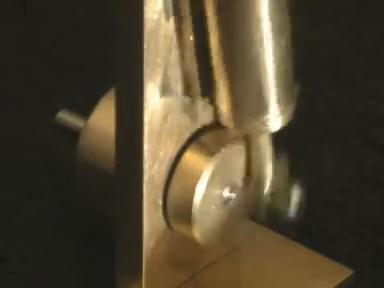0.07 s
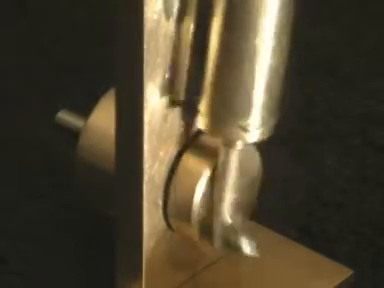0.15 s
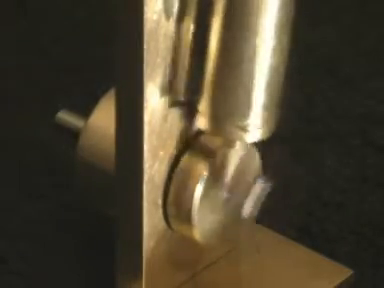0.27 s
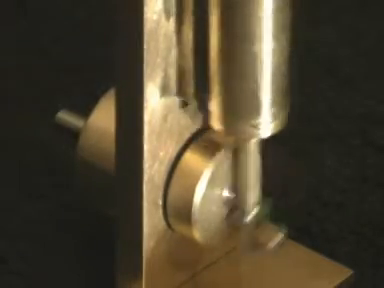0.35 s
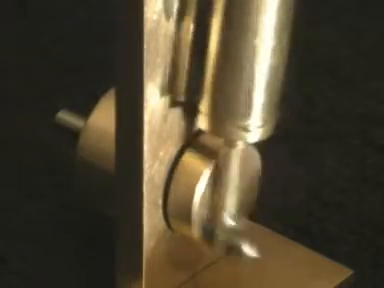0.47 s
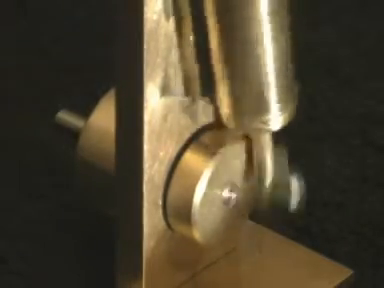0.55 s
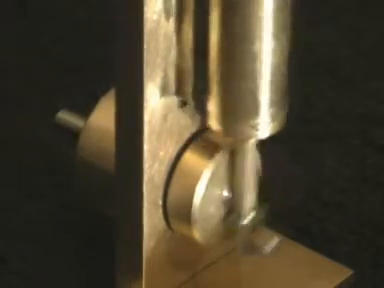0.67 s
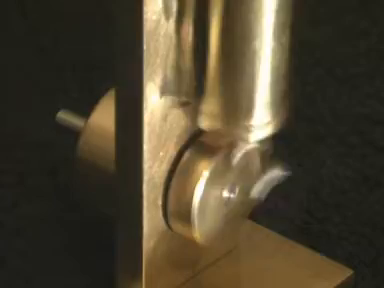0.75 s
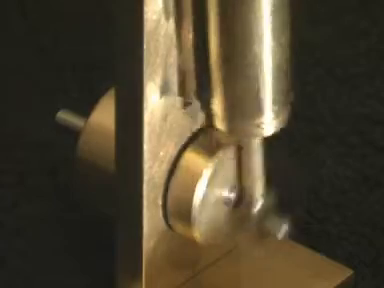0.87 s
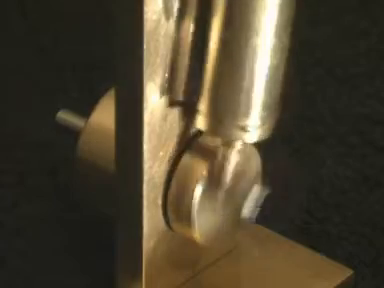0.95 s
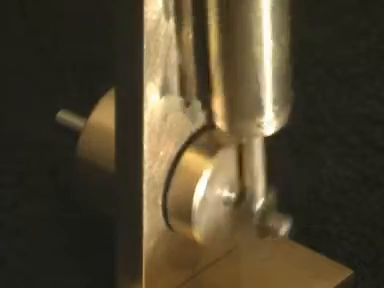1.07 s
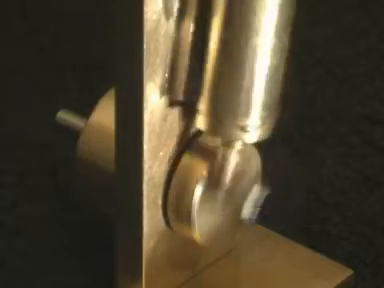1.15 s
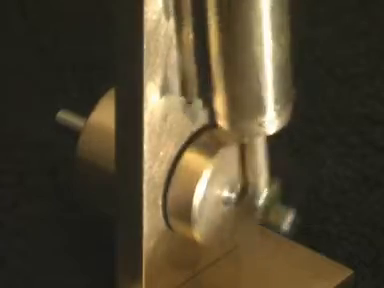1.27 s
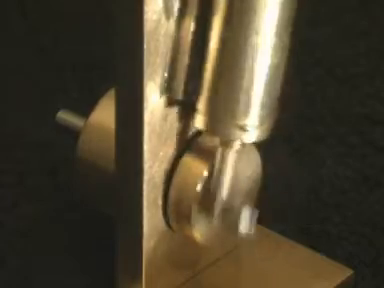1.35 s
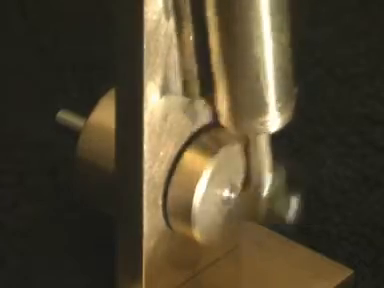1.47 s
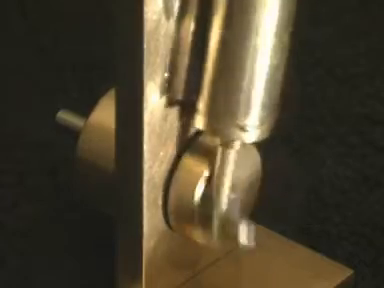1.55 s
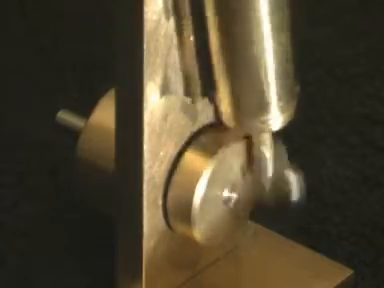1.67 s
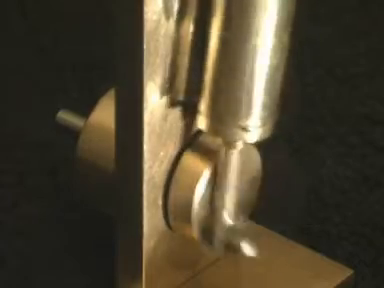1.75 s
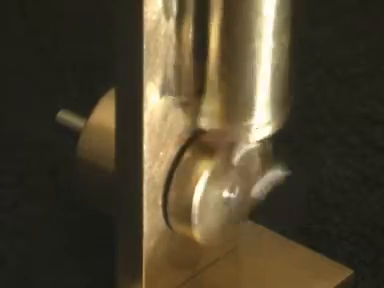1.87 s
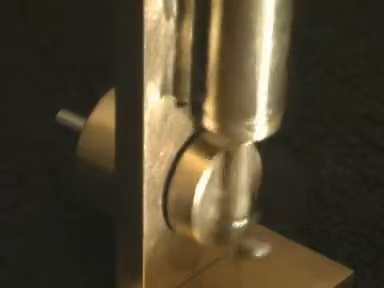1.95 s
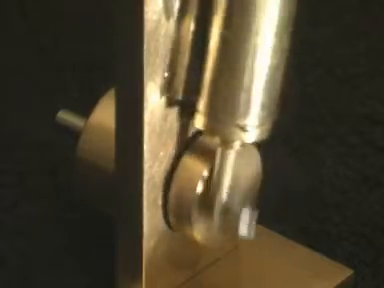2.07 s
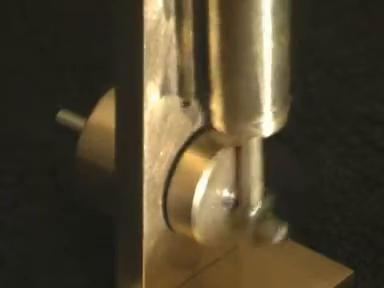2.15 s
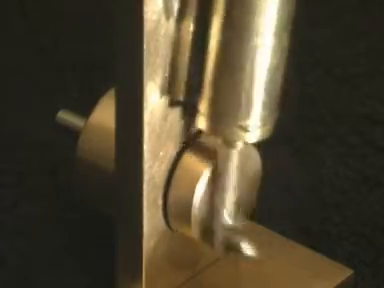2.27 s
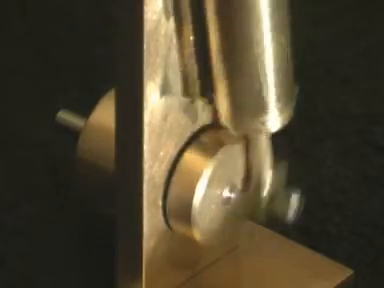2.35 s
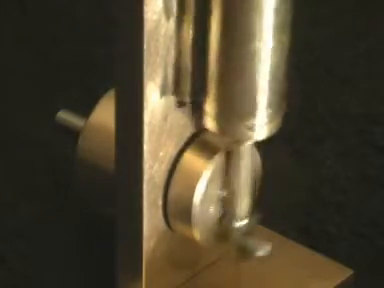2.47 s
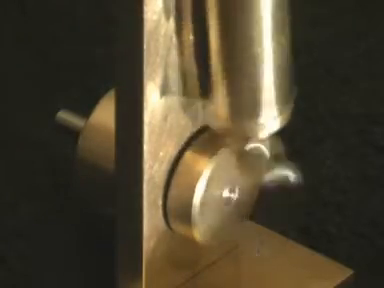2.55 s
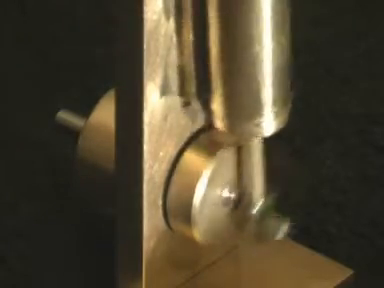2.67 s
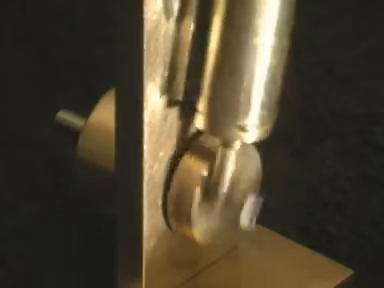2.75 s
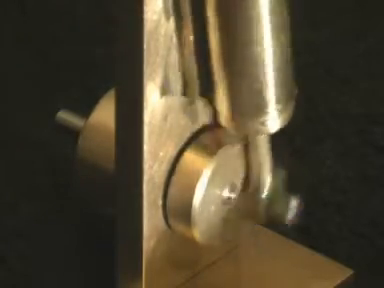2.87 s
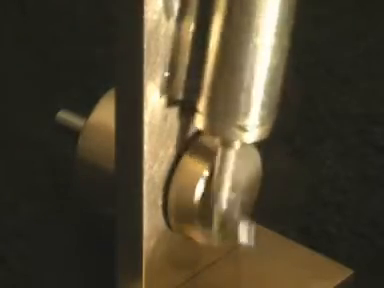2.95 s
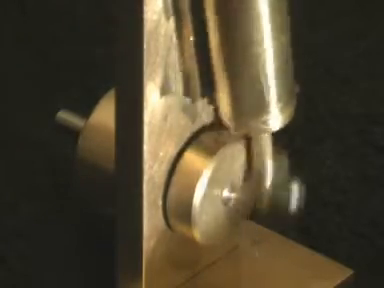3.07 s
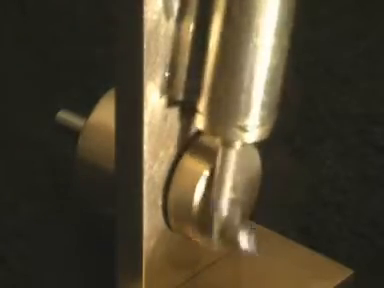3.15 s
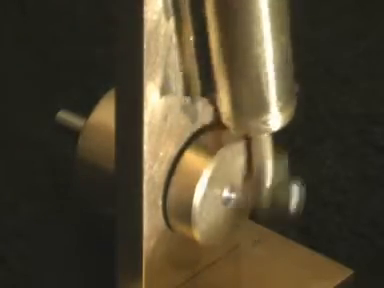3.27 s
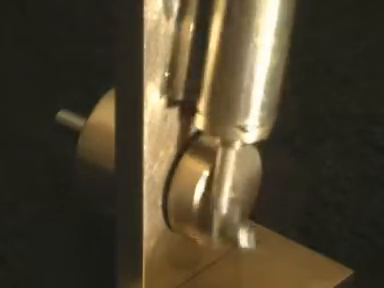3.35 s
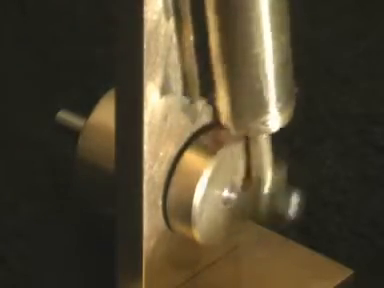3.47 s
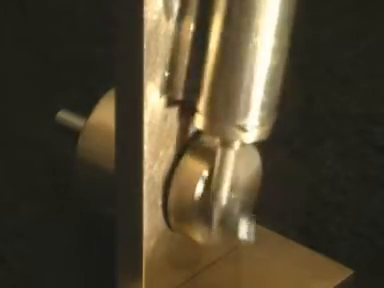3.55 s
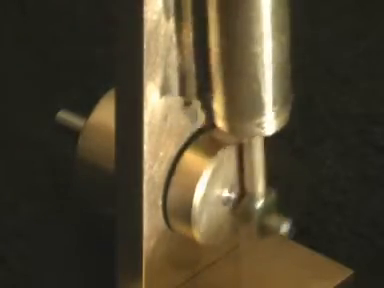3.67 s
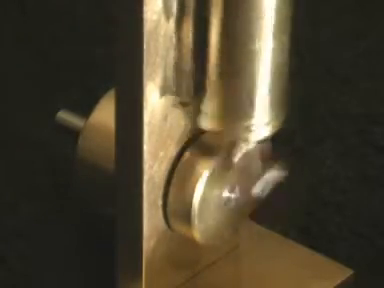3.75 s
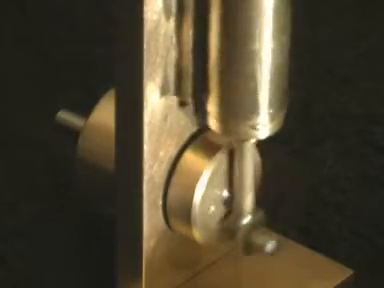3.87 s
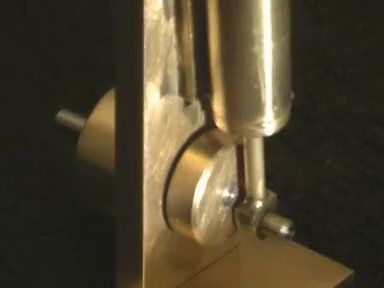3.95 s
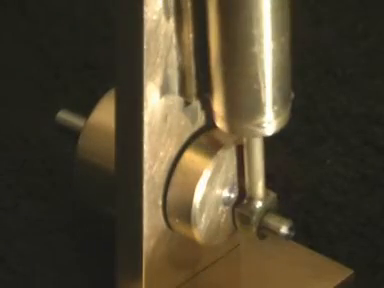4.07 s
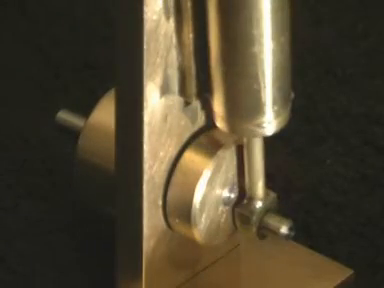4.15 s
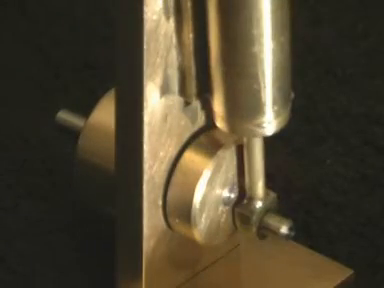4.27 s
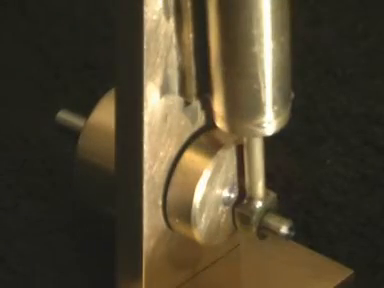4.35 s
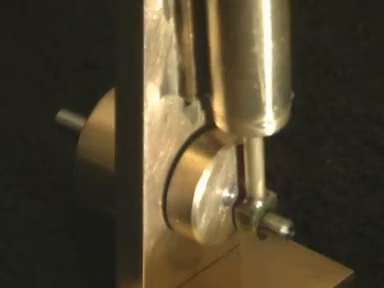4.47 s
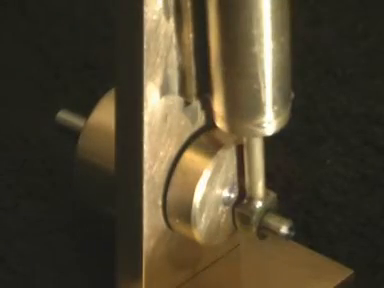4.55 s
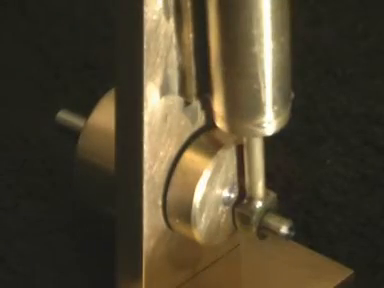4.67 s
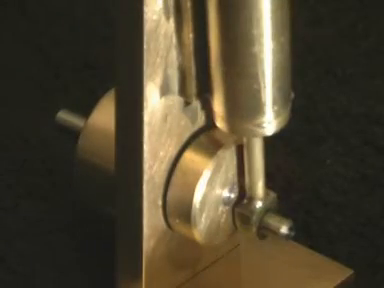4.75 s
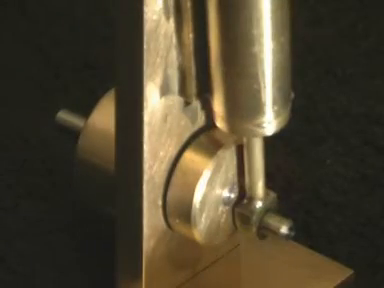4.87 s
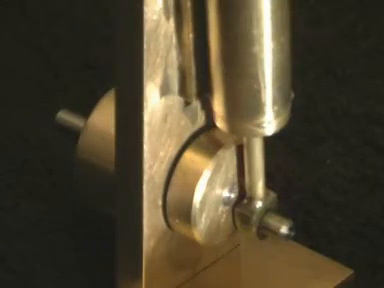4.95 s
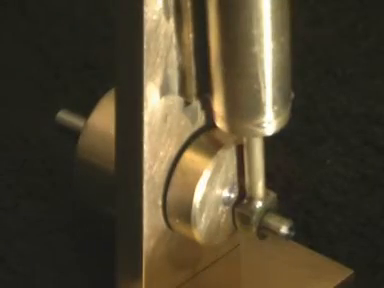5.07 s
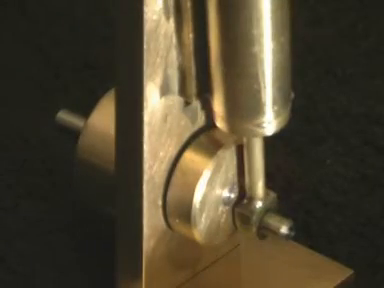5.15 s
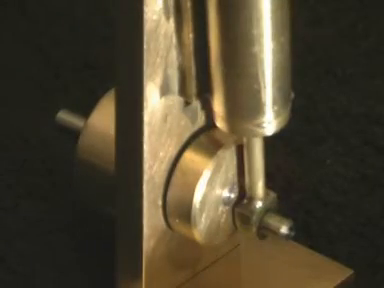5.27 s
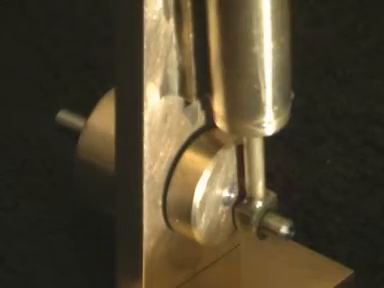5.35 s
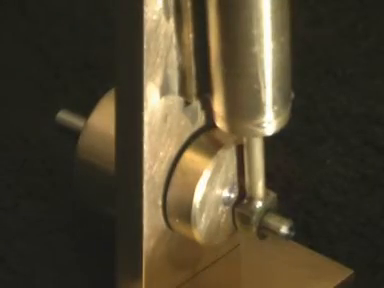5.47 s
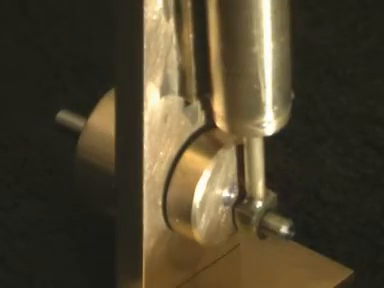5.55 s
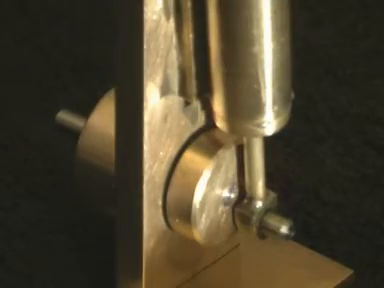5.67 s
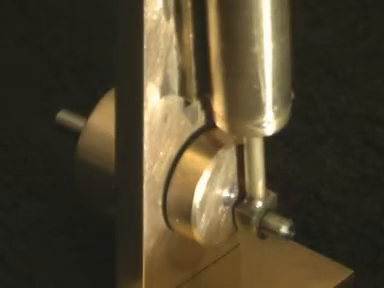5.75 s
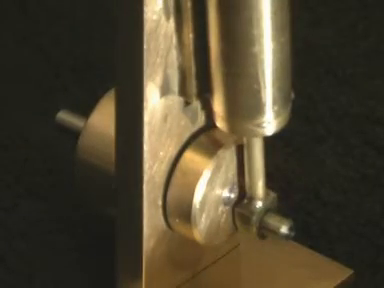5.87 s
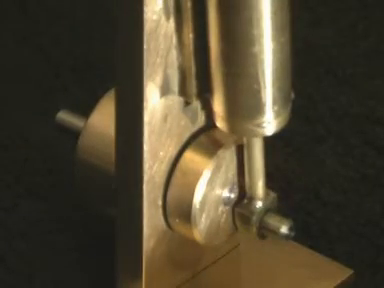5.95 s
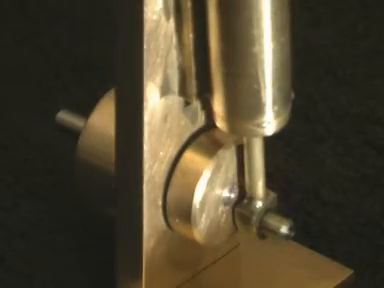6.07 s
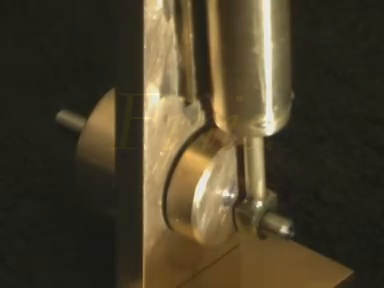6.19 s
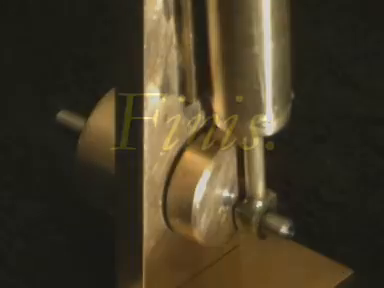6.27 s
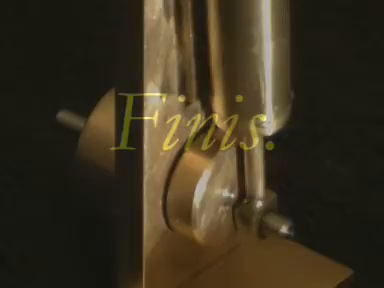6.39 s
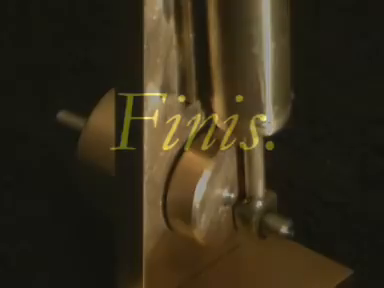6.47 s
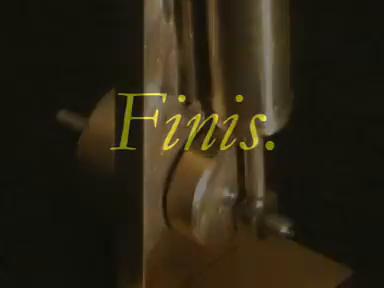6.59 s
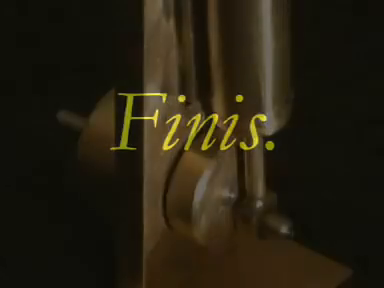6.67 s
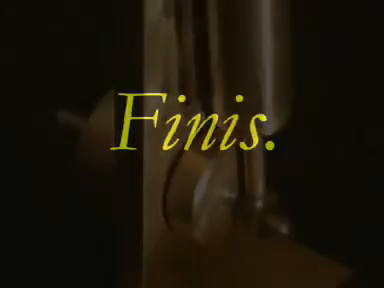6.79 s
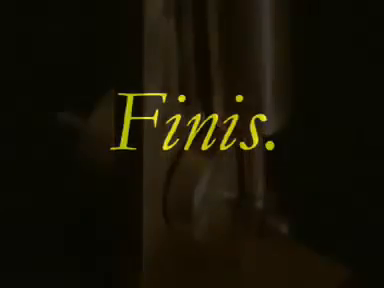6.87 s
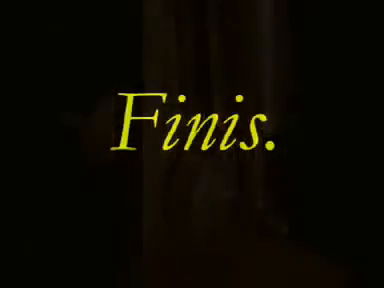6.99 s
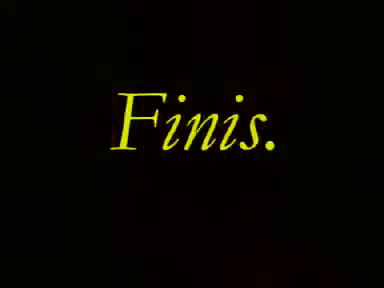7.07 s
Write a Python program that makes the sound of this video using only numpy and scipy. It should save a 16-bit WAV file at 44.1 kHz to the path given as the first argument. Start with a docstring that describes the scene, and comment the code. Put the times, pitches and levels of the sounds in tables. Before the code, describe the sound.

Rapid bright pulses of compressed air from a tiny oscillating engine sag slightly, stutter and cease at four seconds; faint hiss and room hum remain, then fade.

```python
"""In a humming room, a small brass oscillating-cylinder engine runs on compressed air, then slows and stops.
Each turn brings a spit of air, a rush into the cylinder, hiss past the rocking port face, a chuff and knocks.
The air sounds are coloured noise opened and closed by the crank angle; the knocks are short decaying low tones.
Air keeps leaking after the stop; the table, a set of ringing tones, is bumped twice, and all fades out."""
import sys
import numpy as np
from scipy import signal
from scipy.fft import rfft, irfft
from scipy.io import wavfile
from scipy.ndimage import uniform_filter1d

SR = 44100
rng = np.random.default_rng(int(sys.argv[2]) if len(sys.argv) > 2 else 0)


def file_out(sig):
    """Save sig as 16-bit WAV at sys.argv[1]."""
    # one column per channel
    cols = np.atleast_2d(sig).T
    # limit, then scale
    lim = np.clip(cols, -1, 1)
    pcm = np.round(lim * 32767).astype(np.int16)
    wavfile.write(sys.argv[1], SR, pcm)


N = 313992

# crank speed; the crank starts with the inlet just opening: start_s [s], speed [turns per s]
CRANK_SPEED = [(0, 6.166), (.43, 6.488), (1.1, 4.866), (1.33, 5.495), (1.53, 5.232), (1.8, 5.716),
               (2.62, 5.876), (3.6, 4.545), (3.81, 3.846), (3.87, 4.8), (3.93, 4), (3.97, 0)]
# resonances of cylinder, pipe and frame that colour every jet: pitch_hz [Hz], width_hz [Hz], level_db [dB]
BRASS_RINGS = [(1113, 160, 2.5), (1374, 190, 3.5), (1632, 82, 5), (2106, 680, 2.5), (2666, 180, 4.5),
               (3184, 130, 3.5), (3826, 170, 1.5), (4410, 92, 3.5), (4850, 77, 2), (6158, 160, 1.5),
               (7850, 260, 0), (8600, 210, 0), (9600, 190, 0), (10400, 370, 0.5), (10500, 200, 0),
               (12000, 250, 1)]
# steady machine and mains hum in the room: pitch_hz [Hz], level_db [dB rms, before slow wavering]
HUM_TONES = [(49.8, -70.5), (120, -67.5), (150, -62), (163, -64), (214, -72), (250, -71.5), (396, -66.5),
             (426, -70), (456, -71), (490, -72), (513, -69.5), (654, -66.5), (951, -82)]
# colour of the room air: pitch_hz [Hz], level_db [relative dB per Hz]
ROOM_COLOUR = [(25, -33), (75, -16), (110, -2.5), (170, 0), (300, -1.5), (430, 4.5), (580, -3.5),
               (800, 0.5), (1250, -4.5), (2000, -8.5), (5000, -17.5)]
# colour of the seep at the joint: pitch_hz [Hz], level_db [relative dB per Hz]
SEEP_COLOUR = [(1500, -26.5), (4000, -14), (5000, -11.5), (5700, -15), (7100, 0.5), (7900, -2), (8800, 1.5),
               (10300, -7.5), (12200, -8.5), (13250, -13), (13700, -6), (14700, -14), (15400, -20)]
# colour of the leak through the exhaust passage: pitch_hz [Hz], level_db [relative dB per Hz]
VENT_COLOUR = [(500, -13), (1000, -4.5), (1300, 3), (1490, -6.5), (1640, -0.5), (1850, -7), (2250, -4),
               (2420, -7.5), (2700, -3), (2900, 5), (3020, 0), (3200, -1), (4500, -3), (7000, -11)]
# colour of the spit as the inlet opens: pitch_hz [Hz], level_db [relative dB per Hz]
SPIT_COLOUR = [(200, -16), (600, -16), (1100, -12), (1700, -15), (2400, -16.5), (3200, -12), (4500, -8),
               (5600, -12), (7200, -1), (9000, 0.5), (11000, -3), (13000, -9.5), (16000, -13)]
# colour of air rushing through the narrow port into the cylinder: pitch_hz [Hz], level_db [relative dB per Hz]
FILL_COLOUR = [(1500, -19), (2900, -8), (4600, 2), (5800, 0), (8000, -13)]
# colour of the hiss past the port face: pitch_hz [Hz], level_db [relative dB per Hz]
PORT_COLOUR = [(300, -25), (1000, -12.5), (2300, -27), (3200, -12), (4400, -11.5), (5600, -14), (7000, -4),
               (9100, 0), (11000, -4.5), (13000, -8), (16000, -15)]
# colour of the exhaust chuff: pitch_hz [Hz], level_db [relative dB per Hz]
CHUFF_COLOUR = [(200, -23), (550, -21.5), (700, -7.5), (880, -7.5), (1000, 1.5), (1500, -2), (1850, -2.5),
                (2100, 0), (2290, -3), (2480, -8.5), (4000, -15), (7000, -25), (16000, -11.5)]
# the crank pin takes up its play: offset [turns after the inlet opens], level_db [relative dB]
PIN_SLACK = [(-.12, -47.5), (-.025, -49.5), (.555, -51.5)]
# soft bumps on the table and their rebounds: start_s [s], level_db [dB peak, before bass loss], contact_s [s]
TABLE_BUMPS = [(.117, -29, 0.00053), (.129, -45, 0.0027), (4.417, -27, 0.0017), (4.4355, -36.5, .002),
               (4.4595, -32, 0.0025)]
# modes of the table: pitch_hz [Hz], level_db [relative dB], t60_s [s to fall by 60 dB]
TABLE_MODES = [(127, -2, .2), (180, -10, 0.092), (220, -0.5, .2), (277, 0, 0.11), (300, -1, .1),
               (397, 8, 0.061), (478, 6, 0.05)]
# sound scattered by table and walls: pitch_hz [Hz], level_db [dB against the direct sound]
SCATTER_COLOUR = [(100, -10), (300, -15.5), (700, -13), (1400, -17.5), (3000, -10), (5500, -19.5),
                  (7000, -25), (10000, -17), (15000, -13.5)]
# the left microphone has the fuller bass: pitch_hz [Hz], level_db [dB, left minus right]
BASS_TILT_LEFT = [(60, 4), (150, 11), (380, 7.5), (700, 7), (1290, 6), (2380, 2.5), (4400, -0.5),
                  (8120, .5), (15000, 1)]
# phase between the two microphones: pitch_hz [Hz], phase [radians by which left leads]
MIC_PHASE = [(50, -0.29), (430, -1.48), (1000, -0.55), (2300, -0.81), (3400, -0.52), (5600, 0.053),
             (9300, -0.17), (10900, 0.7), (12500, 0.26)]

STOP_S = 3.965  # the stroke dies as the crank comes to rest
SAG_START_S, SAG_DB_PER_S = 2.4, 1.43  # the air supply weakens towards the end
FADE_START_S, FADE_END_S = 6.084, 7.325
TOP_HZ = 15700
# crank positions, in turns after the inlet opens
PRESSURE_AT, EXHAUST_AT = 0.3, 0.36  # full pressure, exhaust wide open
SHUT_AT, RETURN_AT, APPROACH_AT = 0.58, 0.713, 0.925  # port face shut, piston pushing back, inlet about to open
# base levels in dB, before the changes of each turn
SEEP_DB, VENT_DB = -41, -50.5
SPIT_DB, PORT_DB, CHUFF_DB = -25, -25.5, -33

TIME = np.arange(N) / SR
FREQ = np.maximum(np.arange(N // 2 + 1) * SR / N, 1)


def undb(db):
    """Turn decibels into a gain."""
    return 10 ** (np.asarray(db) / 20)


def colour(points):
    """Gain at every frequency, drawn through (pitch_hz, level_db) points."""
    hz, db = np.transpose(points)
    return undb(np.interp(np.log(FREQ), np.log(hz), db))


def noise(gain):
    """Noise of rms 1 with the given colour."""
    x = irfft(rfft(rng.standard_normal(N)) * gain, N)
    return x / x.std()


def walk(rate):
    """Random wander: levels held for 1 / rate seconds, then smoothed twice; its spread is near 1."""
    hold = max(int(SR / rate), 1)
    held = np.repeat(rng.standard_normal(N)[:N // hold + 1], hold)
    smooth = uniform_filter1d(uniform_filter1d(held, hold), hold)
    return 1.3 * smooth[:N]


def window(position, centre, width):
    """A smooth bell-shaped opening and closing around one position."""
    return np.exp(-.5 * ((position - centre) / width) ** 2)


def crank():
    """Crank angle in turns: the running sum of its speed."""
    return np.cumsum(np.interp(TIME, *np.transpose(CRANK_SPEED))) / SR


def inlet_times():
    """The inlet opens at every whole turn."""
    turns = crank()
    return np.interp(np.arange(int(turns[-1]) + 1), turns, TIME)


def stroke(centre, rise_turns, fall_turns):
    """A flow that swells and dies once a turn around one crank position."""
    offset = (crank() - centre + .5) % 1 - .5
    return window(offset, 0, np.where(offset < 0, rise_turns, fall_turns))


def supply(stall_s=.0092):
    """Strength of the working air: steady, then sagging, and gone when the engine stalls."""
    sag = undb(-SAG_DB_PER_S * np.maximum(TIME - SAG_START_S, 0))
    return sag * np.clip((STOP_S - TIME) / stall_s, 0, 1)


def jet(spectrum, flutter_db):
    """Turbulent air, coloured by the brass parts; oil in the gap makes it sputter."""
    rings_db = sum(db / (1 + (2 * (FREQ - hz) / width) ** 2) for hz, width, db in BRASS_RINGS)
    air = noise(colour(spectrum) * undb(rings_db))
    return air * undb(flutter_db * walk(450))


def room(air_db=-56, diffuse_db=-1):
    """Soft room air, partly different at each microphone, and a slightly wavering hum."""
    hum = np.zeros(N)
    for hz, db in HUM_TONES:
        level = np.sqrt(2) * undb(db + .3 * walk(1.96))  # a sine's peak is sqrt(2) times its rms
        phase = 0.088 * walk(2.14) + rng.uniform(0, 2 * np.pi)
        hum += level * np.sin(2 * np.pi * hz * TIME + phase)
    shared, left, right = (noise(colour(ROOM_COLOUR)) for _ in range(3))
    return hum + undb(air_db) * (shared + undb(diffuse_db) * np.array([left, right]))


def microphone_hiss(hiss_db=-62):
    """Faint self-noise, drawn separately for the two channels."""
    spectrum = colour([(30, -18), (150, -1), (1200, 6), (4000, -24), (15000, -5)])
    return undb(hiss_db) * np.array([noise(spectrum), noise(spectrum)])


def bearing(rumble_db=-58):
    """The turning shaft rumbles faintly through the base, fading over the last 1.1 s before the stop."""
    running = np.clip((STOP_S - TIME) / 1.1, 0, 1)
    spectrum = colour([(50, -16), (130, 4.0), (280, -2.5), (420, -1), (800, -12), (2000, -19)])
    return undb(rumble_db) * running * noise(spectrum)


def seep(lift_db=7.0, lift_turns=0.016, settle_turns=0.033, draw_db=-4, draw_at=0.063, draw_turns=0.033):
    """Air always seeps from the joint: more as the inlet is about to open, less while the cylinder draws air."""
    lift = lift_db * stroke(APPROACH_AT, lift_turns, settle_turns)
    draw = draw_db * stroke(draw_at, draw_turns, draw_turns)
    return undb(SEEP_DB + lift + draw) * jet(SEEP_COLOUR, flutter_db=.5)


def vent(push_db=7.5, push_turns=0.058, covered_db=-13, cover_turns=0.068, uncover_turns=0.1):
    """Air leaves the exhaust passage: pushed by the returning piston, throttled while the inlet is open."""
    push = push_db * stroke(RETURN_AT, push_turns, push_turns)
    throttle = covered_db * stroke(0, cover_turns, uncover_turns)
    return undb(VENT_DB + push + throttle) * jet(VENT_COLOUR, flutter_db=1.05)


def steady_leak():
    """Both leaks waver slightly at random and go on after the engine has stopped."""
    return undb(0.24 * walk(6.6)) * (seep() + vent())


def inlet_spits(lead_s=.0024, rise_s=.0022, decay_s=0.01, scatter_db=0.25):
    """A sharp burst of air each time the inlet port uncovers; it dies as the cylinder fills."""
    times = inlet_times()
    flow = np.zeros(N)
    for s, chance in zip(times, rng.standard_normal(len(times))):
        near = slice(max(int((s - .03) * SR), 0), int((s + .1) * SR))
        age = TIME[near] - s
        rise = window(np.minimum(age + lead_s, 0), 0, rise_s)  # full shortly before the opening
        decay = np.exp(-np.maximum(age, 0) / decay_s)
        flow[near] += undb(scatter_db * chance) * rise * decay
    return undb(SPIT_DB) * supply() * flow * jet(SPIT_COLOUR, flutter_db=0.44)


def filling(fill_db=-45, fill_at=0.14, start_turns=0.069, end_turns=0.075):
    """While the inlet is open, air rushes into the cylinder with a lower hiss."""
    flow = supply() * stroke(fill_at, start_turns, end_turns)
    return undb(fill_db) * flow * jet(FILL_COLOUR, flutter_db=2.0)


def port_hiss(build_turns=0.1, ease_turns=.18, shut_turns=0.0092, return_db=-16, return_turns=0.12):
    """Air slips past the rocking face as pressure builds and eases, until it shuts; the return leaks a little."""
    uncovered = .5 - .5 * np.tanh((crank() % 1 - SHUT_AT) / (2 * shut_turns))
    power = stroke(PRESSURE_AT, build_turns, ease_turns) * uncovered
    back = undb(return_db) * stroke(RETURN_AT, return_turns, return_turns)
    level = undb(PORT_DB + 0.55 * walk(90))
    return level * supply() * (power + back) * jet(PORT_COLOUR, flutter_db=1.0)


def chuffs(open_turns=0.087, close_turns=.084, push_turns=.12, push_db=-22.5, uneven_db=1.0):
    """The cylinder dumps its air, then the piston pushes out the rest; slower turns give longer chuffs."""
    dump = stroke(EXHAUST_AT, open_turns, close_turns)
    push = undb(push_db) * stroke(RETURN_AT, push_turns, push_turns)
    level = undb(CHUFF_DB + uneven_db * walk(110))
    return level * supply() * (dump + push) * jet(CHUFF_COLOUR, flutter_db=0.46)


def knocks(knock_hz=112, decay_s=0.0081, spread_db=1.5):
    """As the crank pin takes up its play, three soft thuds a turn swell and die in the base plate."""
    inlet_s = inlet_times()
    pushes = np.zeros(N)
    for offset, db in PIN_SLACK:
        times = inlet_s[:-1] + offset * np.diff(inlet_s)
        levels = undb(db + spread_db * rng.standard_normal(len(times)))
        valid = times > 0
        pushes[(times[valid] * SR).astype(int)] = levels[valid]
    t = TIME[:SR // 4]
    swell = t / decay_s * np.exp(1 - t / decay_s)
    thud = np.sin(2 * np.pi * knock_hz * t) * swell
    return signal.fftconvolve(pushes, undb(-5.5) * thud)[:N]


def table_blows(blows):
    """Half-sine pushes ring the table; a longer contact sounds duller."""
    t = TIME[:SR // 2]
    ring = np.zeros(len(t))
    for hz, db, t60 in TABLE_MODES:
        ring += undb(db) * np.sin(2 * np.pi * hz * t) * np.exp(-np.log(1000) * t / t60)
    out = np.zeros(N + SR)
    for s, db, contact in blows:
        push = np.sin(np.linspace(0, np.pi, max(int(contact * SR), 3)))
        blow = np.convolve(ring, push)
        start = max(int(s * SR), 0)
        out[start:start + len(blow)] += undb(db) * blow / np.abs(blow).max()
    return out[:N]


def radiate(x, corner_hz):
    """A small surface gives off little bass."""
    return signal.sosfilt(signal.butter(2, corner_hz, "high", fs=SR, output="sos"), x)


def surroundings(x, near_s=0.0068, room_t60_s=0.3, room_db=-21):
    """Direct sound plus quick table reflections and a faint room tail, which arrive from the sides."""
    t = TIME[:SR // 3]
    near = np.exp(-t / near_s)
    tail = undb(room_db) * np.exp(-np.log(1000) * t / room_t60_s)
    decay = (t > .0005) * (near + tail)
    echoes = rng.standard_normal(len(t)) * decay / np.linalg.norm(decay)
    scattered = signal.fftconvolve(x, echoes)[:N]
    scattered = irfft(rfft(scattered) * colour(SCATTER_COLOUR), N)
    return np.array([x + scattered, x - scattered])  # opposite signs spread it to the sides


def scene():
    """The engine on a table in a quiet room."""
    air = steady_leak() + inlet_spits() + filling() + port_hiss() + chuffs()
    engine_thuds = radiate(bearing() + knocks(), corner_hz=70)
    bumps = radiate(table_blows(TABLE_BUMPS), corner_hz=148)
    return surroundings(air + engine_thuds + bumps) + room() + microphone_hiss()


def record(dry):
    """Unequal microphones, a fade-out and a steep top cut."""
    phase_hz, radians = np.transpose(MIC_PHASE)
    ratio = colour(BASS_TILT_LEFT) * np.exp(1j * np.interp(FREQ, phase_hz, radians))  # left over right
    gains = 2 * np.array([ratio, np.ones_like(ratio)]) / np.abs(1 + ratio)  # the sum of both keeps its level
    heard = irfft(rfft(dry) * gains, N)
    fade = np.clip((FADE_END_S - TIME) / (FADE_END_S - FADE_START_S), 0, 1) ** 2
    top_cut = signal.ellip(10, .2, 80, TOP_HZ, fs=SR, output="sos")
    return signal.sosfilt(top_cut, heard * fade)


dry = scene()
out = record(dry)
file_out(out)
```